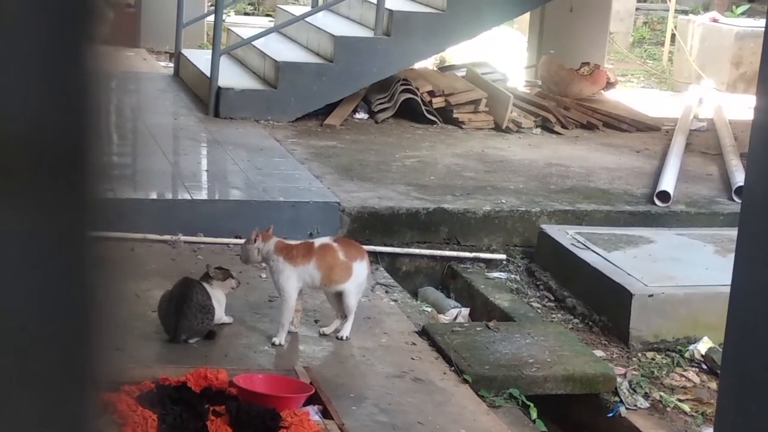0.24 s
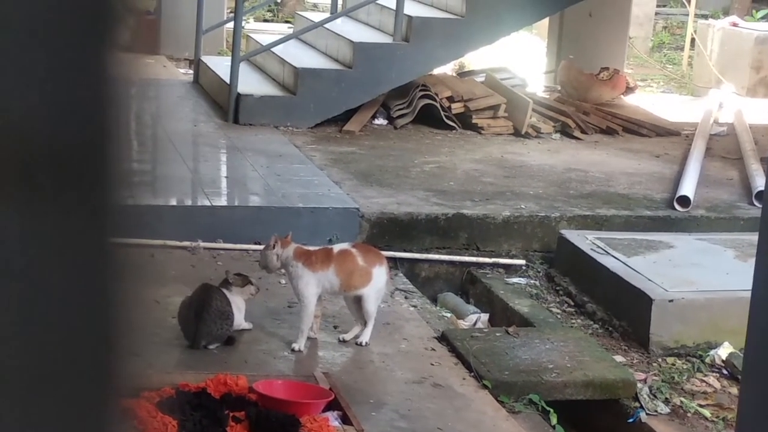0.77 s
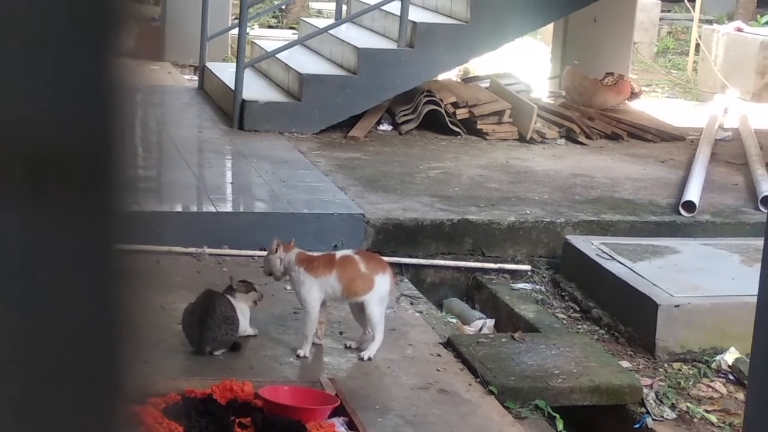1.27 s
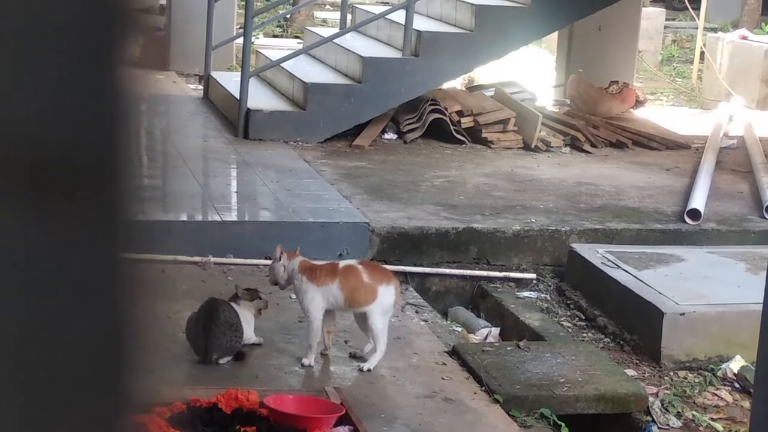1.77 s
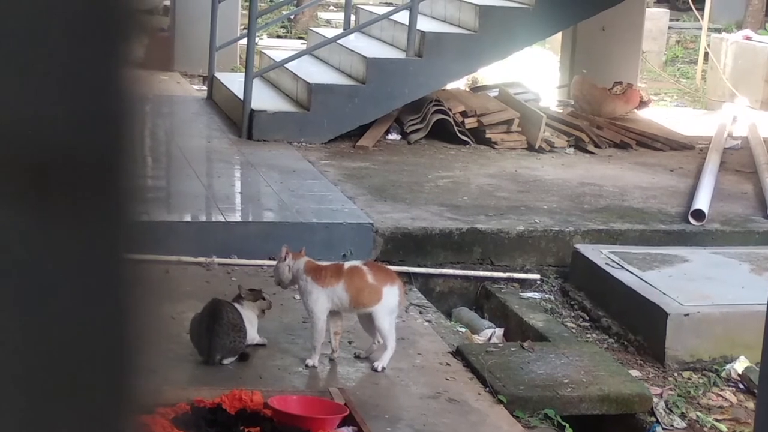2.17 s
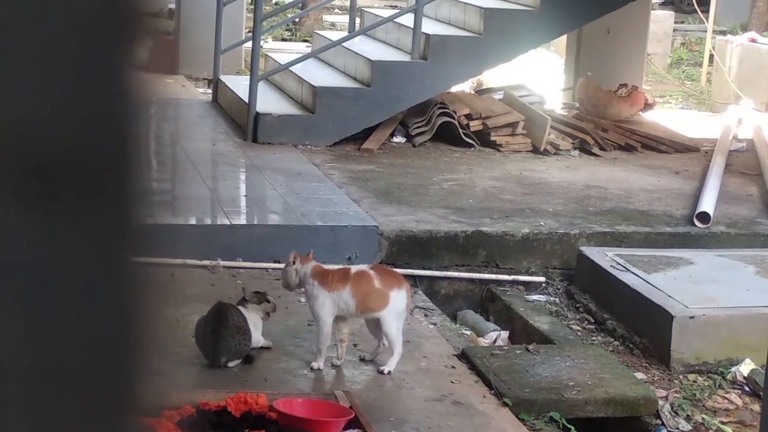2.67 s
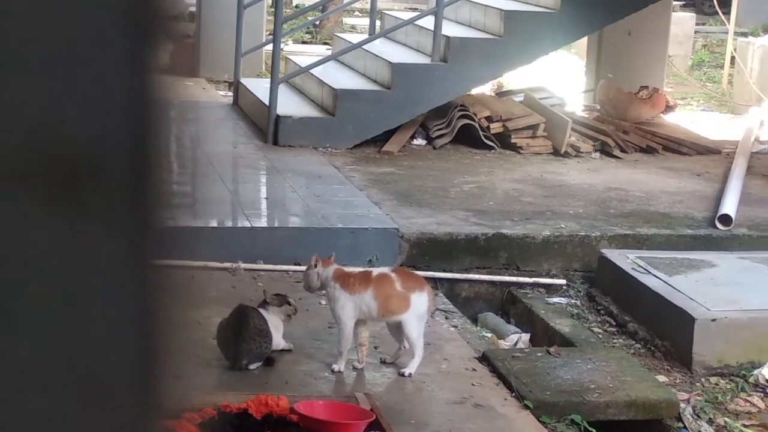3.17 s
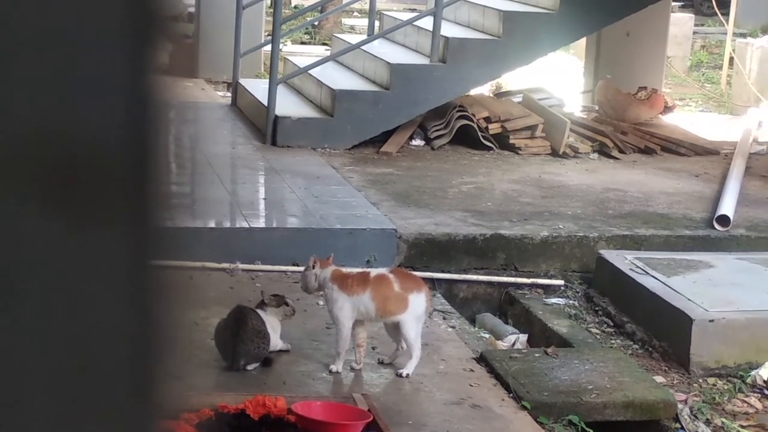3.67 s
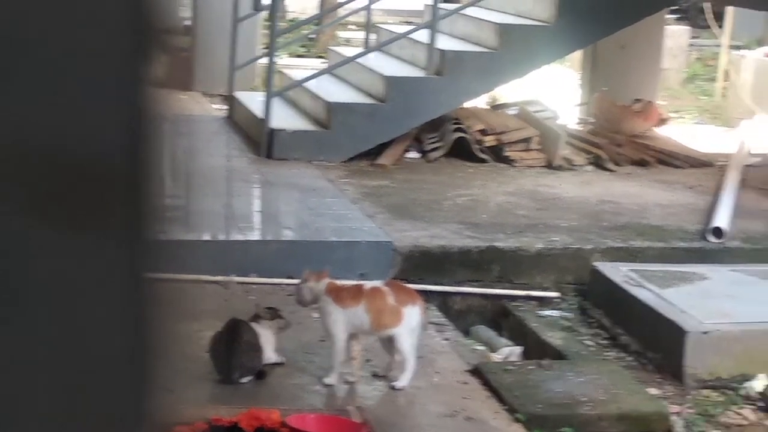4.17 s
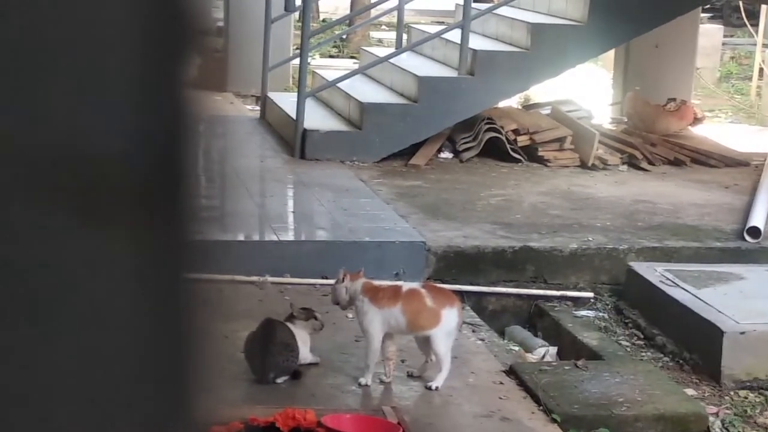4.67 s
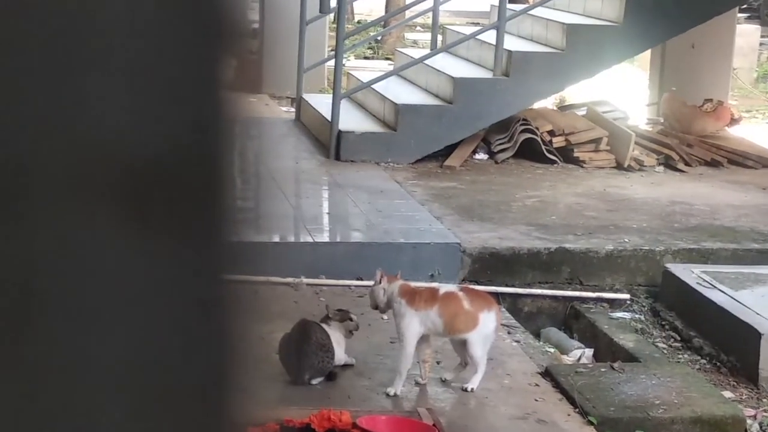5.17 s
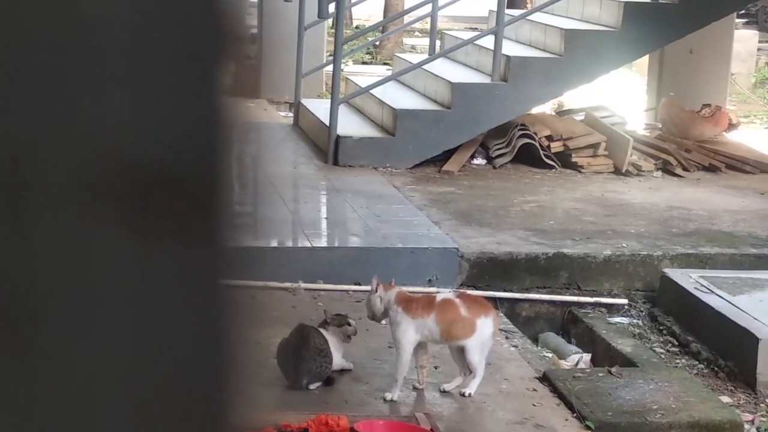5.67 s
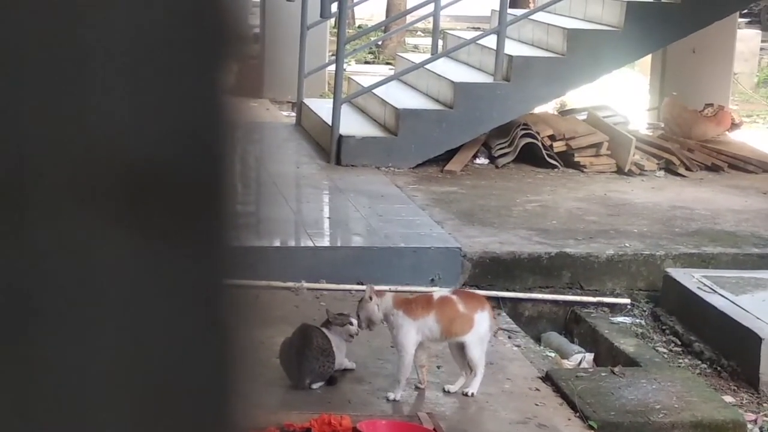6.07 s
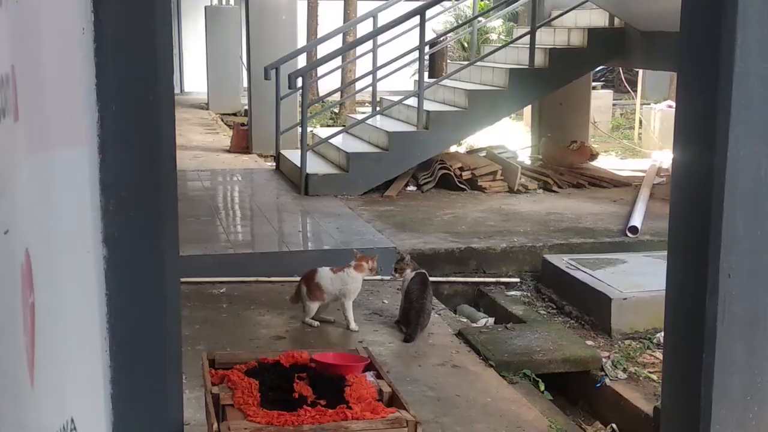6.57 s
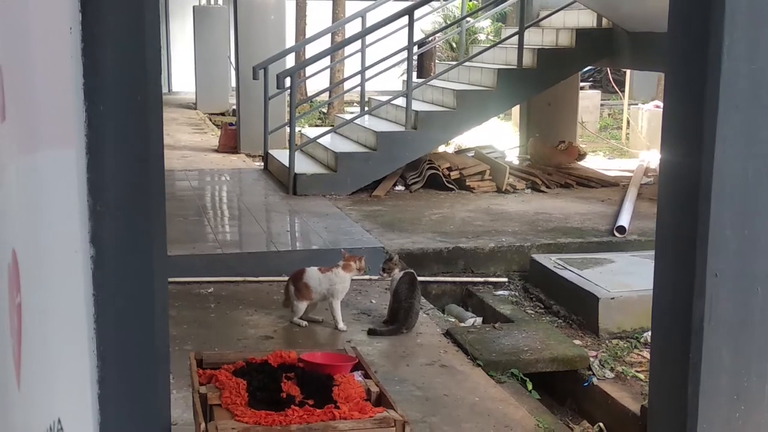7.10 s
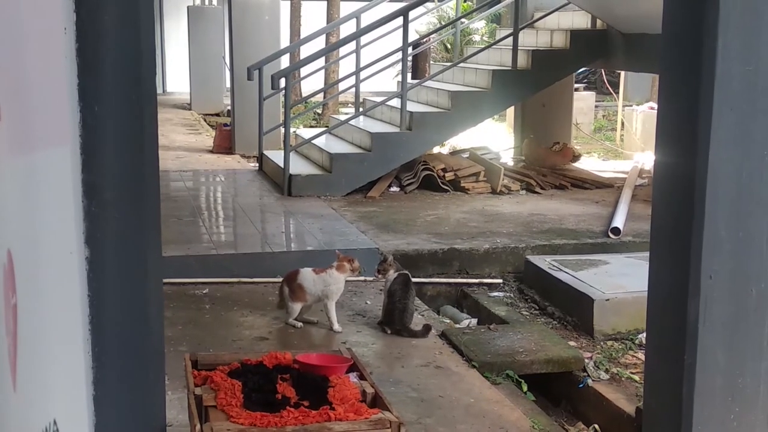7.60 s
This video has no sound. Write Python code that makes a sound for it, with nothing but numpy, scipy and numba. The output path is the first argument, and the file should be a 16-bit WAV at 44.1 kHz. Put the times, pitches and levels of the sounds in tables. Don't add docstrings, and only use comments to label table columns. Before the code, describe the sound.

Tense caterwauling between two cats, one harsh and loud, one breathier, sinking into a growl, before a sudden cut to near silence.

```python
import sys
import numpy as np
from scipy import signal
from scipy.io import wavfile
from scipy.ndimage import uniform_filter1d
from numba import njit

SR = 44100
rng = np.random.default_rng(int(sys.argv[2]) if len(sys.argv) > 2 else 0)


def unload_audio(sound):
    columns = np.transpose(np.atleast_2d(sound))
    steps = np.round(np.clip(columns, -1, 1) * 32767)
    wavfile.write(sys.argv[1], SR, steps.astype(np.int16))


def ratio_of_db(decibels):
    return 10 ** (np.asarray(decibels, float) / 20)


N = 345744
TIME = np.arange(N) / SR
CUT_S = 6.559
CALM_BREATH, SPELL_SLEW_S = .055, .06
EFFORT_DB = -16.5
SIDES = np.array([[1], [-1]])


def first_cat():
    # time in seconds, pitch in Hz.
    pitches = [
        [(.25, 219.6), (.63, 297.6), (.86, 393.9), (1.3, 405.1), (1.64, 389.5), (1.78, 364.6), (2.08, 327.5),
         (2.33, 283.6), (2.5, 272.5)],
        [(4.1, 217), (4.22, 312.3), (4.62, 411.4), (5.12, 394), (5.38, 343.6), (5.63, 334.3), (5.92, 348.7),
         (6.13, 330.7), (6.6, 242.3)],
    ]
    # time in seconds, level in dB, mouth resonance in Hz.
    jaws = [
        [(.25, -50, 423), (.7, -28, 1207), (.87, -18, 1786), (1.13, -21, 1892), (1.4, -19.5, 1940),
         (1.7, -19.5, 1942), (1.95, -21, 1851), (2.22, -30, 1226), (2.5, -48.5, 1040)],
        [(4.1, -40.5, 900), (4.3, -23.5, 1277), (4.55, -17.5, 1676), (4.9, -21.5, 2060), (5.42, -22, 1324),
         (5.82, -23, 1716), (6.0, -22.5, 1600), (6.08, -28, 1067), (6.6, -37.5, 989)],
    ]
    # start in seconds, end in seconds, strong-weak alternation 0-1, breath share.
    spells = [(1.05, 1.52, .95, .06), (1.52, 1.7, .1, .1), (1.7, 2.0, 0, .17), (2.0, 2.5, 0, .14),
              (4.05, 4.17, 0, .2), (5.22, 5.38, 0, .15), (6.08, 6.25, .2, .28), (6.25, 6.6, .3, .5)]
    # treble in dB at 390 Hz pitch, its rise in dB per octave, chest tone in dB,
    # tongue resonance in dB, chest flutter in dB.
    colours = [
        (-40.5, 9, -41, -13.5, 4.5),
        (-43, 0, -44.5, -10.5, 4.5),
    ]
    # start in seconds, end in seconds, level in dB.
    whistles = [
        (5.957, 6.218, -47),
    ]
    # left delay in ms, right delay in ms, level in dB.
    echoes = [
        (1.12, 1.457, -11.5),
        (3.1, 2.28, -23),
        (7.4, 9.1, -7.5),
    ]
    tongue_rule = (1146, 0.662, 230, 7.7)
    return cat(pitches, jaws, spells, colours, tongue_rule, whistles, echoes, pan_db=-9, port_lag=1)


def second_cat():
    # time in seconds, pitch in Hz.
    pitches = [
        [(0, 253.1), (.1, 247.2), (.3, 204.3), (.4, 197.6)],
        [(1.04, 261), (1.15, 420.4), (1.5, 480.8), (1.7, 474.3), (1.83, 455), (2.04, 437.7), (2.28, 423.3),
         (2.55, 392.6), (2.86, 383.3)],
        [(2.82, 383.8), (2.9, 386), (3.0, 366.8), (3.13, 329), (3.28, 283.5), (3.43, 245.9), (3.6, 218.5),
         (3.83, 174.8), (3.95, 160.7)],
        [(4.72, 217.6), (4.92, 399.8), (5.15, 395.8), (5.3, 391), (5.62, 392), (5.85, 383), (6.0, 382.1),
         (6.43, 374.5), (6.6, 352.7)],
    ]
    # time in seconds, level in dB, mouth resonance in Hz.
    jaws = [
        [(0, -34, 1280), (.1, -44, 1270), (.23, -48.5, 940), (.4, -68, 760)],
        [(1.04, -44, 1700), (1.13, -29, 1700), (1.25, -38.5, 2318), (1.55, -25, 2073), (1.9, -27.5, 1930),
         (2.02, -23.5, 1725), (2.3, -27, 1737), (2.55, -25.5, 1600), (2.86, -26, 1626)],
        [(2.82, -27, 1604), (2.87, -22.5, 1690), (2.99, -22, 1550), (3.05, -20.5, 1430), (3.14, -31, 1264),
         (3.3, -50, 1250), (3.5, -53.5, 753), (3.82, -50, 540), (3.95, -54, 627)],
        [(4.72, -29, 1290), (4.8, -28.5, 1550), (4.92, -29, 2000), (5.05, -27, 2050), (5.3, -33.5, 1930),
         (5.62, -28.5, 1744), (5.95, -27, 1609), (6.25, -31, 1575), (6.6, -24, 1540)],
    ]
    # start in seconds, end in seconds, strong-weak alternation 0-1, breath share.
    spells = [(1, 1.12, 0, .2), (1.12, 1.5, 0, .35), (1.5, 1.97, .1, .45), (1.97, 2.53, 0, .09),
              (2.53, 2.83, .3, .25), (3.12, 3.3, 0, .14), (3.3, 3.7, 0, .12), (3.7, 4, 0, .18),
              (4.7, 4.88, 0, .28), (4.88, 5.17, .2, .07), (5.17, 5.33, .3, .28), (5.33, 6.3, .3, .2),
              (6.3, 6.6, .2, .17)]
    # treble in dB at 390 Hz pitch, its rise in dB per octave, chest tone in dB,
    # tongue resonance in dB, chest flutter in dB.
    colours = [
        (-46.5, 14.4, -42, -17.5, 4.3),
        (-51, 20, -39.5, -21.5, 3.8),
        (-47, 29, -41, -19, 4),
        (-48, 24, -38, -17, 2.9),
    ]
    # start in seconds, end in seconds, level in dB.
    whistles = [
        (2.9, 3.329, -54.5),
    ]
    # left delay in ms, right delay in ms, level in dB.
    echoes = [
        (1.2, .7, -13.5),
        (2.7, 3.6, -0.5),
        (8.3, 6.5, -0.5),
    ]
    tongue_rule = (1740, 0.313, 17, 0.41)
    return cat(pitches, jaws, spells, colours, tongue_rule, whistles, echoes, pan_db=-9.5, port_lag=-1)


def cat(pitches, jaws, spells, colours, tongue_rule, whistles, echoes, pan_db, port_lag):
    state = folds(spells)
    calls = zip(pitches, jaws, colours)
    voice = sum(yowl(pitch, jaw, state, colour, tongue_rule, whistles) for pitch, jaw, colour in calls)
    thin = butter(voice, 697, "highpass", order=2)
    out = np.array([np.roll(thin, max(port_lag, 0)), np.roll(thin, max(-port_lag, 0))])
    for left_ms, right_ms, db in echoes:
        for side, ms in enumerate((left_ms, right_ms)):
            lag = int(ms * SR / 1000)
            out[side, lag:] += ratio_of_db(db) * thin[:-lag]
    return voice - thin + panned(out, pan_db)


def yowl(pitch, jaw, state, colour, tongue_rule, whistles):
    # centre in seconds, length in seconds, change of the whole voice in dB.
    stutters = [(0.357, 0.028, -10), (0.429, 0.028, -12), (0.488, 0.04, -13), (0.628, .03, 0),
                (0.667, 0.026, -3), (1.019, .03, -6), (1.894, 0.016, -3), (2.11, 0.013, -1),
                (2.239, 0.022, -3.5), (2.442, .025, -7.5), (2.503, .025, -7), (2.922, 0.0081, -5),
                (3.016, 0.022, -5.5), (4.381, 0.014, -5.5), (4.454, 0.0096, -3.5), (4.48, 0.0068, -8),
                (5.375, 0.027, -3), (6.225, 0.036, -3)]
    # whistle in Hz at 390 Hz pitch, width share, level in dB (unused), power of the pitch ratio.
    larynx_whistle = [
        (5060, .035, 6, 1.0),
    ]
    glide_s, attack_s, release_s = .06, 0.054, 0.011
    begin, end = jaw[0][0], jaw[-1][0]
    span = slice(int(begin * SR), int(end * SR))
    t = TIME[span]
    hz = uniform_filter1d(along(t, pitch)[0], int(glide_s * SR), mode="nearest")
    db, mouth_hz = along(t, jaw)
    half, breath = (c[span] for c in state)
    treble_db, per_octave_db, chest_db, tongue_db, flutter_db = colour
    since = t - begin + (begin == 0)

    phase, early, pulse, puff = glottis(hz, half, breath)
    mouth_hz = mouth_hz * (1 + .03 * walk(9, count=len(t)))
    source = pulse + breath * puff
    front = mouth_sound(source, mouth_hz, half)
    front = front + tongue_sound(source, mouth_hz, half, tongue_db, tongue_rule, span)
    front = butter(front, 3280, "lowpass", order=8)
    front = front - svf(front, 0.26 * hz, 0.91)
    quiet_db = np.maximum(EFFORT_DB - db, 0)
    flutter = (1.5 + 0.0245 * quiet_db) * np.tanh(walk(13.9, count=len(t)))

    voice = ratio_of_db(db + flutter) * front
    voice = voice + throat_sound(early, puff, hz, breath, db, since, treble_db, per_octave_db, span)
    voice = voice + chest_tone(phase, hz, mouth_hz, breath, db, chest_db, flutter_db, span)
    for f, w, _, p in larynx_whistle:
        tone = even(twice(source, f * (hz / 390) ** p, w))
        voice = voice + tone * sum(ratio_of_db(g) * held(a, b, SPELL_SLEW_S)[span] for a, b, g in whistles)
    voice = voice * ratio_of_db(centred(stutters, 0.01474)[span])
    voice = voice * np.clip(np.minimum(since / attack_s, (end - t) / release_s), 0, 1)
    return np.pad(voice, (span.start, N - span.stop))


def folds(spells):
    half, breath = 0, CALM_BREATH
    for start, stop, alternation, share in spells:
        gate = held(start, stop, SPELL_SLEW_S)
        half = half + alternation * gate
        breath = breath + (share - CALM_BREATH) * gate
    return half, breath


def glottis(hz, half, breath):
    count = len(hz)
    jitter = .0035 + .03 * (breath - CALM_BREATH)
    phase = 2 * np.pi * np.cumsum(hz * (1 + jitter * walk(60, count=count))) / SR
    early = phase + .3 * half * np.sin(phase / 2 + 1)
    pulse = pulses(early, .9)
    pulse = pulse * (1 + 0.28 * half * np.cos(phase / 2)) * ratio_of_db(1.43 * walk(90, count=count))
    puff = np.sqrt(pulse) * rng.standard_normal(count) * 8
    return phase, early, pulse, puff


def pulses(phase, share):
    return (1 - share ** 2) / (1 + share ** 2 - 2 * share * np.cos(phase))


def mouth_sound(source, mouth_hz, half):
    # multiple of the main resonance, width share, level in dB.
    resonances = [
        (1.0, 0.22, 14),
        (.62, 0.63, -12.5),
        (.33, 0.38, -9),
    ]
    out = 0
    for k, (multiple, width, db) in enumerate(resonances):
        level = ratio_of_db(db - 14 * half * (k > 0))
        out = out + (-1) ** k * level * twice(source, multiple * mouth_hz, width)
    ring = even(twice(source, 0.956 * mouth_hz, 0.017))
    return even(even(out) + half * ratio_of_db(-0.5) * ring)


def tongue_sound(source, mouth_hz, half, db, rule, span):
    # start in seconds, end in seconds, gain in dB, shift in Hz.
    lifts = [(-.1, 0.275, 5.5, 100), (1.5, 1.693, 3, -100), (2.06, 2.34, 17, -130),
             (2.85, 3.099, 10.5, 101), (3.1, 3.655, 5.5, 88), (4.05, 4.253, 3, 147.5),
             (4.95, 5.206, 5, -50), (5.402, 6.04, -0.5, -52), (6.38, 6.6, 7.5, 19.5)]
    shut_hz, per_hz, gain_hz, gain_db = rule
    db = db + spanned(lifts, 2)[span] + gain_db * half
    hz = shut_hz + spanned(lifts, 3)[span] + per_hz * mouth_hz + gain_hz * half
    return ratio_of_db(db) * even(twice(source, hz, 0.043))


def throat_sound(early, puff, hz, breath, effort_db, since, treble_db, per_octave_db, span):
    # resonance in Hz at 390 Hz pitch, width share, level in dB, power of the pitch ratio.
    resonances = [(4227, 0.11, 6, 0.12), (3746, 0.17, 0, 0.68), (5650, 0.22, 5.5, 0.59),
                  (7860, 0.13, 2.5, 0.83), (10660, 0.18, 0, 0.68), (12840, 0.13, -3.5, 0.71)]
    # start in seconds, end in seconds, treble change in dB.
    treble_swells = [
        (1.05, 1.5, 1.5),
        (2.03, 2.36, -1.5),
        (3.02, 3.11, -4),
        (4.22, 4.55, 2.5),
    ]
    lift = hz / 390
    sunk_octaves = np.minimum(np.log2(lift), 0)
    airy = pulses(early, .93) + (breath + 0.23) * puff
    throat = 0
    for f, width, db, power in resonances:
        bloom_db = -3.5 * min(np.log2(f / resonances[0][0]), .7) * sunk_octaves
        level = ratio_of_db(db + bloom_db + 1.5 * walk(14, count=len(hz)))
        throat = throat + level * twice(airy, f * np.minimum(lift, 1.04) ** power, width)
    smear_s = .004
    smear = signal.chirp(np.arange(0, smear_s, 1 / SR), 1500, smear_s, 17000)
    throat = signal.fftconvolve(even(throat), smear / np.linalg.norm(smear))[:len(hz)]
    throat = throat * np.clip(since / .05, 0, 1)
    treble_db = treble_db + spanned(treble_swells, 2)[span] + per_octave_db * sunk_octaves
    return ratio_of_db(treble_db + 0.47 * (effort_db - EFFORT_DB)) * throat


def chest_tone(phase, hz, mouth_hz, breath, effort_db, db, flutter_db, span):
    # centre in seconds, length in seconds, change in dB.
    catches = [(1.103, 0.16, -5), (1.917, 0.13, -6.5), (2.332, .1, -3), (3.092, 0.033, -6),
               (3.18, 0.037, -8), (3.276, 0.15, 6), (3.36, 0.057, -15), (3.44, 0.052, 0.5),
               (3.514, 0.078, -10), (3.623, 0.056, 9), (3.68, 0.058, -14), (3.873, 0.1, -13)]
    db_per_khz = -21.5
    effort = effort_db - EFFORT_DB
    chest_db = db + centred(catches, 0.066)[span] + 0.11 * effort
    chest_db = chest_db + db_per_khz * np.maximum(mouth_hz - 1700, 0) / 1000
    chest_db = chest_db + 22 * np.minimum(np.log2(hz / 235), 0)
    chest_db = chest_db + (flutter_db + 6.5 * breath) * np.tanh(walk(21.83, count=len(hz)))
    octave_db = db + 2.5 + db_per_khz * np.maximum(mouth_hz - 900, 0) / 1000
    octave_db = octave_db + 0.42 * effort + 5 * walk(17.36, count=len(hz))
    return np.sqrt(2) * (ratio_of_db(chest_db) * np.cos(phase) + ratio_of_db(octave_db) * np.cos(2 * phase))


def hisses():
    # centre in seconds, length in seconds, centre in Hz, level in dB, glide in Hz per second.
    breaths = [(2.95, 0.07, 14700, -42, -7000), (3.12, .025, 14600, -45.5, -2),
               (2.8, 0.035, 14600, -60.5, -1), (4.35, 0.046, 14150, -51.5, 4992),
               (6.51, 0.035, 14800, -35, -1), (5.44, .02, 15200, -46, 0), (2.4, .05, 16000, -68, -6000),
               (2.4, .09, 12000, -68, -4000), (6.5, 0.021, 15200, -45, 0), (5.96, .02, 15200, -54, 0),
               (3.4, 0.17, 13000, -43, -2.5), (1.8, .12, 12000, -49.5, 2001), (6.25, .05, 14000, -47, 0)]
    out = np.zeros((2, N))
    for s, length, hz, db, glide in breaths:
        path_hz = np.clip(hz + glide * (TIME - s), .8 * hz, 1.4 * hz)
        out += ratio_of_db(db) * swelling_noise(s, length, path_hz, .07)
    return out


def stairwell(cats):
    t60_s = 0.48
    lags = np.array([701, 887, 1093, 1327, 1597, 1873, 2203, 2579])
    heard = butter(cats.mean(axis=0), 190, "highpass", order=2)
    return ratio_of_db(-9) * walls(heard, lags, ratio_of_db(-60 * lags / SR / t60_s), 0.11)


@njit
def walls(x, lags, gain, damp):
    line, soft, out = np.zeros((8, 4096)), np.zeros(8), np.zeros((2, len(x)))
    for i in range(len(x)):
        total = 0.
        for k in range(8):
            soft[k] += (1 - damp) * (gain[k] * line[k, (i - lags[k]) & 4095] - soft[k])
            total += soft[k]
            out[k % 2, i] += soft[k]
        for k in range(8):
            line[k, i & 4095] = x[i] + soft[k] - total / 4
    return out


def handling():
    # start in seconds, peak in dB, left minus right in dB.
    ticks = [
        (6.817, -28, 3),
    ]
    # centre in seconds, length in seconds, centre in Hz, level in dB.
    rustles = [
        (6.805, 0.052, 3856, -52),
        (6.822, 0.0074, 8790, -49.5),
        (7.576, .03, 10100, -63),
    ]
    out = np.zeros((2, N))
    for s, db, pan_db in ticks:
        start = int(s * SR)
        out[:, start:start + 5] += panned(np.array([[.3, -.7, -1, -0.8, .1]]), pan_db) * ratio_of_db(db)
    for s, length, hz, db in rustles:
        out += ratio_of_db(db) * swelling_noise(s, length, np.full(N, 1. * hz), .25)
    return out


def puffs():
    # start in seconds, length in seconds, level at 30-110 Hz in dB, level at 110-240 Hz in dB.
    gusts = [(0.055, 0.076, -50.5, -64), (0.169, 0.13, -54, -46), (0.394, 0.21, -49.5, -63),
             (0.718, 0.095, -52.5, -67), (0.899, 0.071, -83, -48.5), (1.04, 0.032, -72, -47),
             (1.182, 0.058, -71, -45), (1.406, 0.07, -82, -52), (1.533, 0.16, -78, -53.5),
             (2.101, 0.051, -77, -56), (2.357, 0.076, -55, -75), (2.444, 0.06, -71, -49),
             (2.588, 0.091, -59, -50), (2.697, 0.72, -59.5, -51.5), (3.42, 0.49, -60, -49),
             (4.07, 0.043, -84, -50), (4.164, 0.32, -57, -54), (4.533, 0.22, -55, -61),
             (4.832, 0.16, -57, -54.5), (5.178, 0.17, -55.5, -59), (5.475, 0.045, -72, -53),
             (5.672, 0.12, -80, -58.5), (6.234, 0.076, -54, -68), (6.372, 0.22, -54.5, -65),
             (6.678, 0.071, -77.5, -48.5), (6.789, 0.064, -74, -47), (7.191, 0.15, -52, -59),
             (7.464, 0.074, -83, -47), (7.609, 0.029, -42.5, -66), (7.762, 0.15, -82, -63)]
    gates = np.array([held(s, s + length, 0.067) for s, length, _, _ in gusts])
    _, _, deep_db, upper_db = np.transpose(gusts)
    out = 0
    for hz, lull_db, puff_db in (((42, 110), -82.5, deep_db), ((110, 230), -79, upper_db)):
        mid, side = (even(butter(rng.standard_normal(N), hz, "bandpass", order=3), 0.025) for _ in range(2))
        size = ratio_of_db(lull_db - 5 * (TIME > CUT_S)) + ratio_of_db(puff_db) @ gates ** 2
        out = out + size * ratio_of_db(4 * walk(14)) * (mid + 0.31 * side * SIDES)
    return out


def yard():
    # frequency in Hz, level in dB per Hz.
    spectrum = [(300, -0.5), (600, -4.5), (1600, -20.5), (2700, -19.5), (5500, -47), (8100, -15),
                (10000, -33.5), (15500, -31.5)]
    spectrum_hz, spectrum_db = np.transpose(spectrum)
    before = TIME < CUT_S
    out, swell = 0, walk(0.52)
    for hz in 280 * 2 ** np.arange(0, 5.9, .5):
        mid, side = (band(rng.standard_normal(N), hz, hz / 3) for _ in range(2))
        db = np.interp(np.log(hz), np.log(spectrum_hz), spectrum_db) + .4 * swell + 1.5 * walk(9)
        db = db - before * np.log2(hz / 600)
        out = out + ratio_of_db(db) * (mid + min((hz / 650) ** 2, .9) * side * SIDES)
    return out / np.std(out) * ratio_of_db(np.where(before, -47.5, -53.5))


@njit
def svf(x, hz, width):
    y, b, l = np.empty(len(x)), 0., 0.
    for i in range(len(x)):
        g = np.tan(np.pi * hz[i] / SR)
        v = (b + g * (x[i] - l)) / (1 + g * (g + width))
        b, l, y[i] = 2 * v - b, l + 2 * g * v, width * v
    return y


def twice(x, hz, width):
    return svf(svf(x, hz, 1.47 * width), hz, 1.47 * width)


def band(x, hz, width):
    return svf(x, np.full(len(x), 1. * hz), width / hz)


def butter(x, hz, kind, order=4):
    return signal.sosfilt(signal.butter(order, hz, kind, fs=SR, output="sos"), x)


def swelling_noise(s, length, hz, width):
    noise = rng.standard_normal((2, N)) * np.exp(-.5 * ((TIME - s) / length) ** 2)
    return 3 * np.array([twice(port, hz, width) for port in noise])


def walk(rate, count=N):
    k = int(SR / rate)
    steps = np.repeat(rng.standard_normal(count // k + 1), k)
    return 1.46 * uniform_filter1d(uniform_filter1d(steps, k), k)[:count]


def even(x, span_s=0.14):
    k = int(span_s * SR)
    return x / np.sqrt(uniform_filter1d(uniform_filter1d(x ** 2, k), k) + 1e-18)


def panned(x, pan_db):
    return x * ratio_of_db(pan_db * SIDES / 2)


def held(start, stop, edge_s):
    return np.clip(np.minimum(TIME - start, stop - TIME) / edge_s + .5, 0, 1)


def spanned(rows, column):
    return sum(row[column] * held(row[0], row[1], SPELL_SLEW_S) for row in rows)


def centred(rows, edge_s):
    return sum(db * held(s - length / 2, s + length / 2, edge_s) for s, length, db in rows)


def along(t, table):
    s, *columns = np.transpose(table)
    return [np.interp(t, s, c) for c in columns]


def scene():
    # start in seconds, end in seconds.
    bass_open = [(0.491, 0.67), (0.693, 0.75), (1.5, 2.06), (2.28, 2.33), (2.68, 3.44), (3.39, 3.92),
                 (4.138, 4.82), (5.15, 5.59), (5.55, 6.01), (6.2, 6.6)]
    cats = first_cat() + second_cat()
    cats = butter(cats + stairwell(cats), 130, "highpass")
    cats = cats + 0.14 * SIDES * np.array([band(c, 9200, 5000) for c in cats])
    far = cats * np.clip((CUT_S - TIME) / 0.0011, 0, 1) + butter(yard(), 300, "highpass")
    opened = uniform_filter1d(sum(1. * (TIME > a) * (TIME < b) for a, b in bass_open), 600)
    far = opened * far + (1 - opened) * butter(far, 391, "highpass", order=8)
    return far + puffs() + handling() + hisses()


def mute_weak_bands(x):
    # frequency in Hz, muting limit against the neighbours in dB.
    mute = [(2400, -14), (3500, -5.5), (6000, -7.5), (8600, -1), (10300, -3), (12500, 0), (14000, -1),
            (15000, -4)]
    hz, _, z = signal.stft(x, SR, nperseg=1024)
    power = uniform_filter1d((np.abs(z) ** 2).mean(axis=0), size=6, axis=1)
    narrow_db = 10 * np.log10(uniform_filter1d(power, size=4, axis=0) + 1e-20)
    around_db = uniform_filter1d(narrow_db, size=32, axis=0)
    patches = rng.standard_normal((len(hz) // 4 + 1, z.shape[2] // 6 + 1))
    wander = np.kron(patches, np.ones((4, 6)))[:len(hz), :z.shape[2]]
    limit_db = np.interp(hz, *np.transpose(mute), left=-99)[:, None] + 2.5 * wander
    return signal.istft(z * (narrow_db > limit_db + around_db), SR, nperseg=1024)[1][:, :N]


def band_limit(x):
    return signal.sosfilt(signal.butter(12, 15710, fs=SR, output="sos"), x)


def record(dry):
    ceiling = .7
    rounded = ceiling * np.tanh(dry / ceiling)
    top = signal.ellip(8, .3, 60, 15680, fs=SR, output="sos")
    mix = mute_weak_bands(signal.sosfilt(top, rounded))
    return band_limit(mix)


dry = scene()
out = record(dry)
unload_audio(out)
```